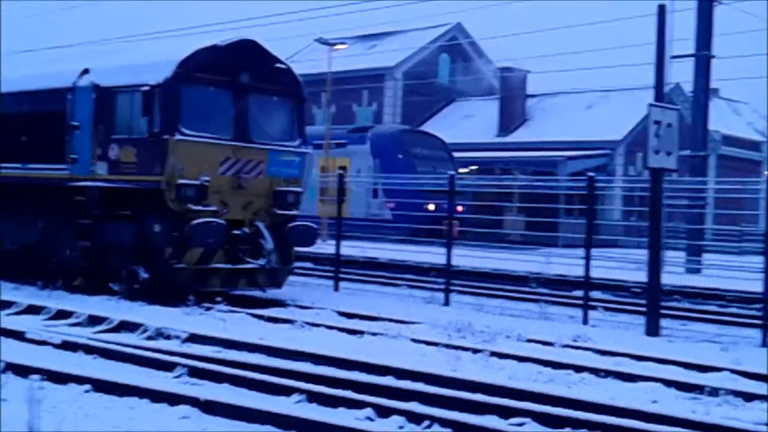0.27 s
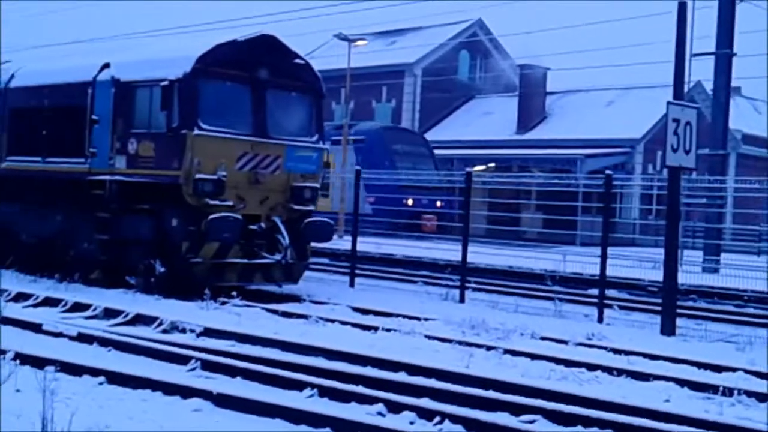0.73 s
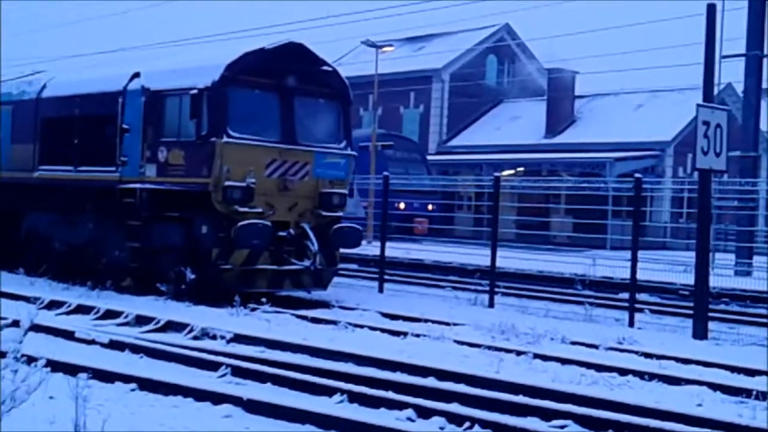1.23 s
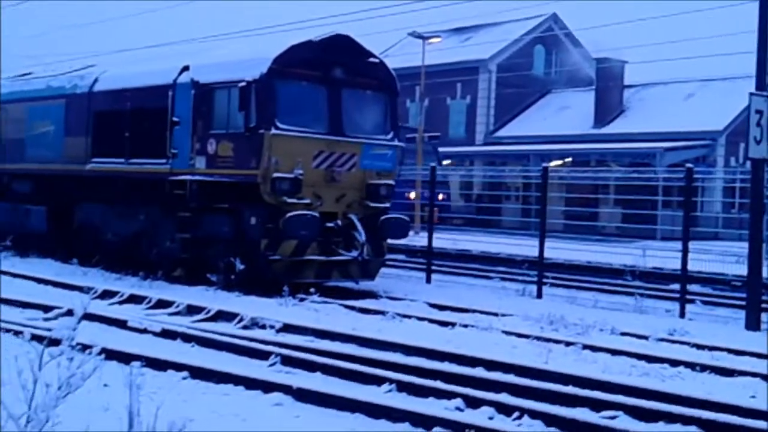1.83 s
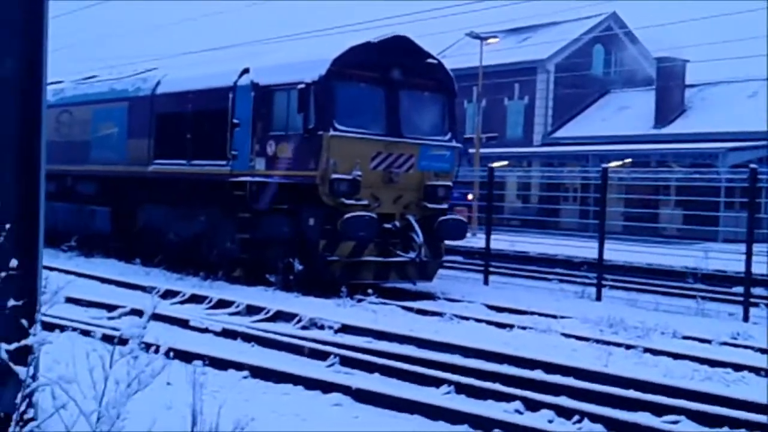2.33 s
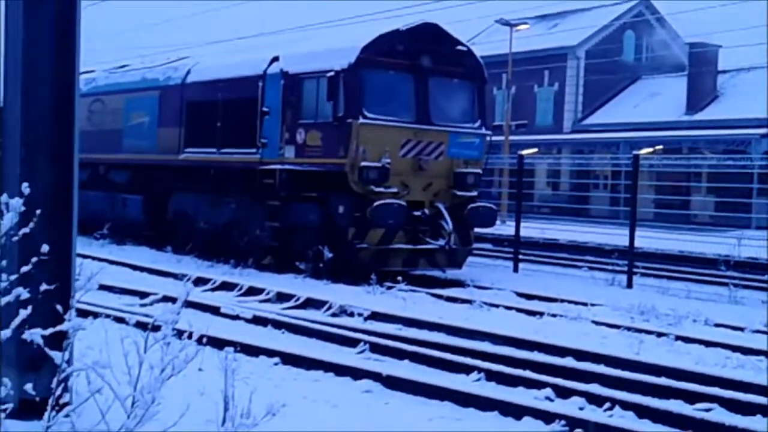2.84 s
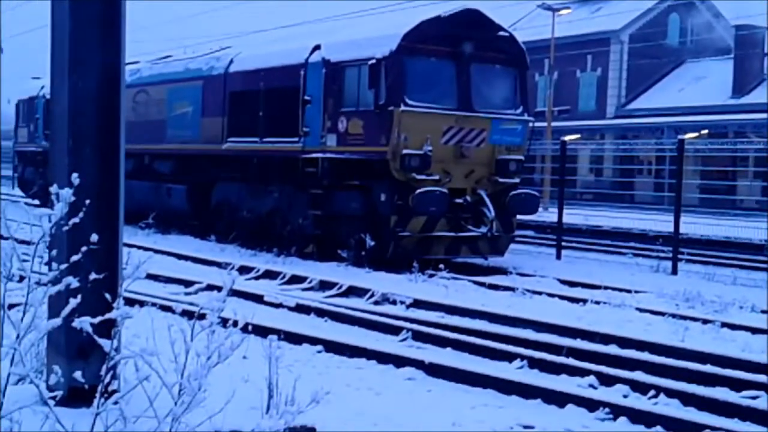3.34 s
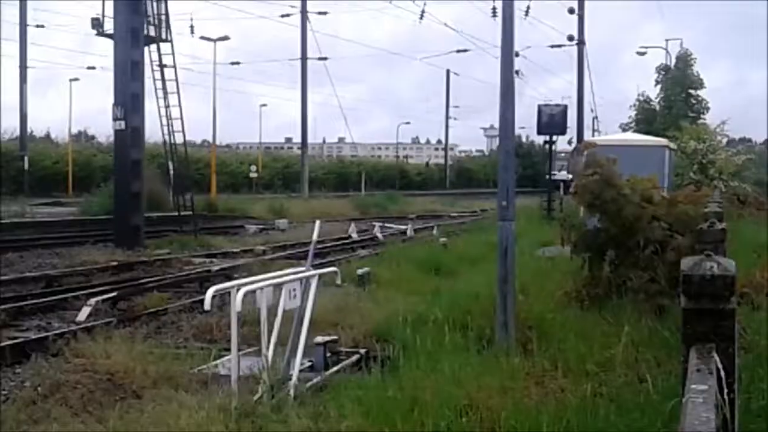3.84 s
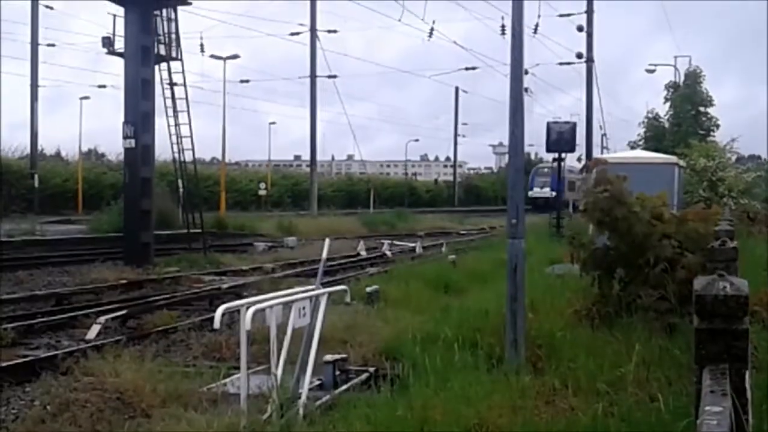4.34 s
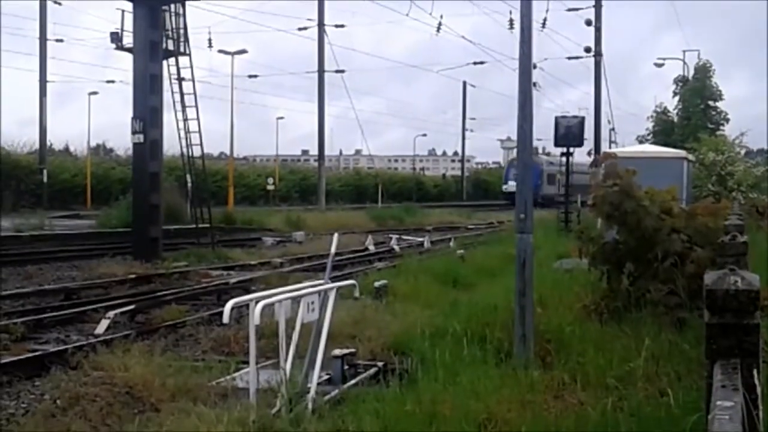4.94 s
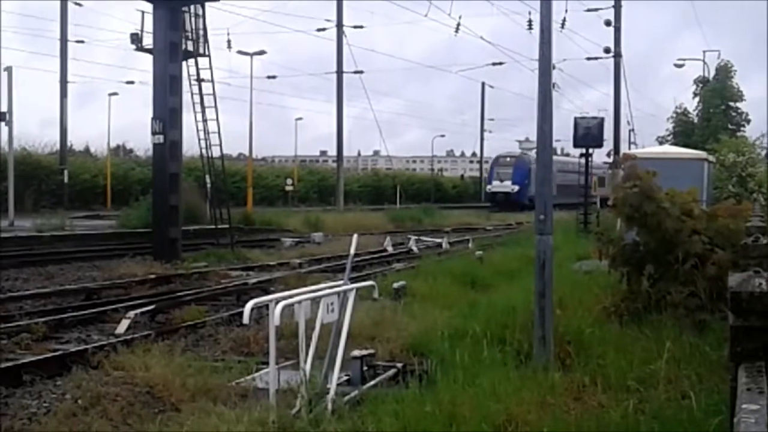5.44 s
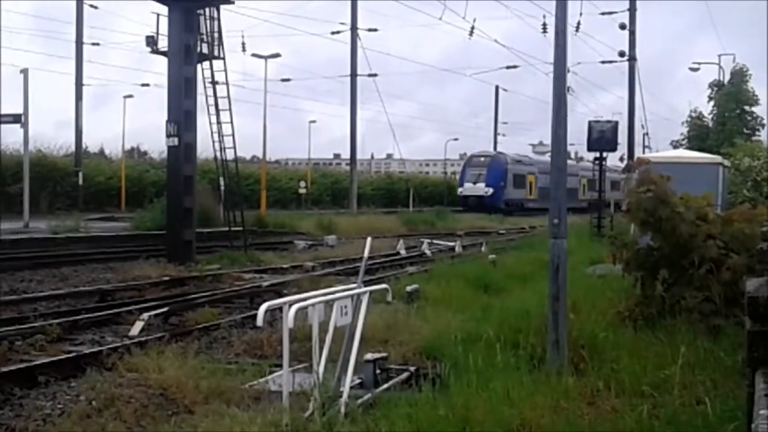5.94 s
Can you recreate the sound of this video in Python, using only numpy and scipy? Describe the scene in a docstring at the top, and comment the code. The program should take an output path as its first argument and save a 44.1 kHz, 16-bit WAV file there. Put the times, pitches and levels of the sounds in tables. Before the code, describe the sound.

A diesel locomotive rumbles by with loud, high wheel squeals; after a brief silence, an electric train approaches while raindrops tick close up.

```python
"""A diesel locomotive rumbles slowly through a curve in a snowy yard. Its flanges scrape, its running
gear moans, and stick-slip sets two wheels squealing and beating together. Fingers knock the camera.
After a short silence, a second yard: an electric train nears over wet tracks with rumble, wheel roar
and motor hum while raindrops tick on the camera's shell. A distant bird chirps in both yards."""
import sys
import numpy as np
from scipy import signal
from scipy.fft import rfft, irfft, next_fast_len
from scipy.io import wavfile
from scipy.ndimage import uniform_filter1d, map_coordinates

SR = 44100
rng = np.random.default_rng(int(sys.argv[2]) if len(sys.argv) > 2 else 0)


def log_audio(samples):
    """Write samples as a 16-bit WAV file to the path given in sys.argv[1]."""
    # one column per channel
    frames = np.atleast_2d(samples).T
    # limit to full scale, then quantise
    limited = np.clip(frames, -1, 1)
    pcm = np.round(limited * 32767).astype(np.int16)
    wavfile.write(sys.argv[1], SR, pcm)


N = 273414
SNOW_END_S, RAIN_START_S = 3.846, 4.234


def amp(db):
    """Decibels to gain."""
    return 10 ** (np.asarray(db) / 20)


def unit(x):
    """Scale to rms 1."""
    return x / np.sqrt(np.mean(np.abs(x) ** 2) + 1e-20)


def clock():
    """Sample times in seconds."""
    return np.arange(N) / SR


def curve(rows):
    """Interpolate (time, value) rows at every sample."""
    return np.interp(clock(), *np.transpose(rows))


def during(start_s, end_s, fade_s):
    """Gate with linear fades."""
    return np.clip(np.minimum(clock() - start_s, end_s - clock()) / fade_s, 0, 1)


def wobble(rate_hz):
    """Smooth random curve, rate_hz knots a second."""
    return map_coordinates(rng.standard_normal(8192), [clock() * rate_hz + 2], mode="wrap")


def filtered(x, response):
    """Apply a gain given as a function of frequency."""
    size = next_fast_len(N + 8192)
    return irfft(rfft(x, size) * response(np.fft.rfftfreq(size, 1 / SR)), size)[:N]


def rush(spectrum, patchy_db):
    """Coloured noise of rms 1 with random gain patches in time and frequency."""
    bins = signal.stft(rng.standard_normal(N), nperseg=512)[2]
    patches = uniform_filter1d(rng.standard_normal(bins.shape), size=4, axis=0)
    patches = uniform_filter1d(patches, size=12, axis=1)
    noise = signal.istft(bins * amp(patchy_db * unit(patches)), nperseg=512)[1][:N]
    hz, db = np.transpose(spectrum)
    return unit(filtered(noise, lambda f: amp(np.interp(np.log(f + 1), np.log(hz), db, left=-120))))


def spin(hz):
    """Phasor following a pitch curve."""
    return np.exp(2j * np.pi * np.cumsum(hz) / SR)


def scattered(share, rate_hz):
    """Complex gain of a direct path plus shifting reflections; mean power 1."""
    reflections = unit(wobble(rate_hz) + 1j * wobble(rate_hz))
    return np.sqrt(1 - share) + np.sqrt(share) * reflections


def hum(tones, share, rate_hz):
    """Machine tones of steady pitch and wavering level."""
    return sum(np.sqrt(2) * amp(db) * (spin(np.full(N, hz)) * scattered(share, rate_hz)).real
               for hz, db in tones)


def whistle(length_s, start_hz, end_hz, arch_hz):
    """Arched glide that swells and fades."""
    progress = np.linspace(0, 1, int(length_s * SR))
    arch = np.sin(np.pi * progress)
    return arch * spin(start_hz + (end_hz - start_hz) * progress + arch_hz * arch).imag


def tap(modes, centre_hz, width_octaves, contact_s, crack_db):
    """Small impact: a crack and a ring favouring the modes near centre_hz."""
    t = np.arange(SR // 25) / SR
    ring = np.zeros(len(t))
    for k, (hz, db, t60_s) in enumerate(modes):
        weight = 1 / (1 + (np.log2(hz / centre_hz) / width_octaves) ** 2)
        spread_db, detune = rng.normal(0, 1.5), rng.normal(1, .04)
        envelope = weight * amp(db + spread_db - 60 * t / t60_s)
        ring += (-1) ** k * envelope * np.sin(2 * np.pi * hz * detune * t)
    ring *= 1 - np.exp(-t / contact_s)
    crack = rng.standard_normal(len(t)) * amp(crack_db - 60 * t / .004)
    crack = signal.lfilter(*signal.butter(2, 6500, fs=SR), crack)  # soft contact dulls the top
    return ring / np.abs(ring).max() + crack


def add(track, start_s, sound):
    """Mix a short sound into a track."""
    part = track[max(round(start_s * SR), 0):][:len(sound)]
    part += sound[:len(part)]


def yard_echo(x, t60_s):
    """Diffuse echo from wagons and station walls."""
    t = np.arange(SR // 2) / SR
    tail = rng.standard_normal(len(t)) * amp(-60 * t / t60_s) * (t > .01)
    return signal.fftconvolve(x, tail / np.linalg.norm(tail))[:N]


# Locomotive noise spectra: (frequency [Hz], relative density [dB])
EXHAUST_SPECTRUM = [(12, -38.5), (20, -20.5), (86, 6), (103, 0), (124, 0), (320, -23), (420, -42.5),
                    (700, -120)]
ROLLING_SPECTRUM = [(120, -33), (200, -4.5), (258, -4.5), (338, -6), (384, -3.5), (465, -5), (640, -8.5),
                    (727, -10), (1540, -13), (1640, -14.5), (2480, -16), (3000, -25.5), (4610, -17.5),
                    (6650, -34.5), (9000, -41.5), (11700, -61), (19800, -120)]
HISS_SPECTRUM = [(1500, -23.5), (2100, 4.5), (3200, 2), (7000, -0.5), (10000, -1), (15000, -2)]
# Engine hum and fan whine: (frequency [Hz], level [dB])
ENGINE_TONES = [(79, -68.5), (97, -55), (388, -57.5), (554, -64), (2083, -69.5)]


def locomotive(curve_entry_s=1.3, curve_full_s=1.85):
    """Steady exhaust, engine tones and a few moans; rolling noise and hiss grow in the curve."""
    in_curve = np.interp(clock(), [curve_entry_s, curve_full_s], [0, 1])
    exhaust = amp(-45.5 + .75 * wobble(20)) * rush(EXHAUST_SPECTRUM, patchy_db=1.5)
    rolling = amp(-50 + 1.24 * in_curve + .8 * wobble(12)) * rush(ROLLING_SPECTRUM, patchy_db=1.6)
    hiss = amp(-56.5 + 3 * in_curve) * rush(HISS_SPECTRUM, patchy_db=1.9)
    return exhaust + rolling + hiss + gear_moans() + hum(ENGINE_TONES, share=.38, rate_hz=10)


# Flange rubbing: (time [s], level [dB])
SCRAPE_LEVEL = [(0, -62), (1.25, -62), (1.285, -52), (1.38, -58.5), (2.3, -54), (2.9, -56), (3.6, -47.5)]
# Flange noise: (frequency [Hz], relative density [dB])
FLANGE_SPECTRUM = [(2600, -19.5), (3400, -12), (4200, -7), (5100, 1.5), (5800, -22.5), (8000, -40.5)]


def flange_scrape():
    """Flanges rub the rail with an uneven hiss."""
    return amp(curve(SCRAPE_LEVEL) + 1.3 * wobble(37)) * rush(FLANGE_SPECTRUM, patchy_db=1.5)


# Syllables: (time [s], length [s], start pitch [Hz], end pitch [Hz], arch [Hz], relative level [dB])
BIRD_CHIRPS = [(.215, 0.018, 4860, 4080, 90, -50), (0.764, 0.025, 3990, 4750, 340, -44.5),
               (.792, 0.039, 3850, 3860, 540, -52), (0.798, 0.025, 3480, 3430, 202, -49.5),
               (0.83, 0.052, 3410, 2970, -110, -52), (1.397, 0.04, 4580, 2680, 80, -58),
               (1.955, 0.029, 2740, 3940, -150, -50), (1.993, .033, 3400, 3080, 170, -50),
               (2.026, .024, 3100, 2890, -30, -48), (3.48, .044, 3680, 3220, 208, -50.5),
               (3.53, 0.046, 3360, 2930, -10, -51), (5.911, .058, 4520, 4190, 129, -44)]


def bird():
    """Short, distant whistles blurred by the yard."""
    song = np.zeros(N)
    for start_s, length_s, start_hz, end_hz, arch_hz, db in BIRD_CHIRPS:
        add(song, start_s, amp(db + 2.5) * whistle(length_s, start_hz, end_hz, arch_hz))
    return song + amp(-2.5) * yard_echo(song, t60_s=.5)


# Finger bumps: (time [s], relative level [dB])
FINGER_KNOCKS = [(0.356, -32), (0.397, -35.5), (0.4157, -31.5), (0.468, -20)]
# Camera case modes: (frequency [Hz], relative level [dB], t60 [s])
CASE_MODES = [(380, -5, .013), (660, 0, .014), (1150, -4, .011), (2500, -8, .006)]


def knocks(click_band_hz=(500, 3000), click_t60_s=.006, thud_hz=130, thud_t60_s=.04):
    """Fingers bump the camera: a dry click, the case rings, the whole body thuds."""
    out, t = np.zeros(N), np.arange(SR // 25) / SR
    click_filter = signal.butter(3, click_band_hz, "bandpass", fs=SR)
    thud = amp(-13 - 60 * t / thud_t60_s) * np.sin(2 * np.pi * thud_hz * t)
    for start_s, db in FINGER_KNOCKS:
        ring = tap(CASE_MODES, centre_hz=640, width_octaves=1.1, contact_s=.00016, crack_db=-24)
        burst = rng.standard_normal(len(t)) * amp(4 - 60 * t / click_t60_s)
        click = signal.lfilter(*click_filter, burst)
        add(out, start_s, amp(db) * (ring + click + thud))
    return out


# Gear moans: (time [s], length [s], start pitch [Hz], end pitch [Hz], relative level [dB])
GEAR_MOANS = [(0.622, 0.35, 620, 645, -49.5), (0.85, 0.31, 632, 657, -54.5), (2.12, 0.11, 975, 1000, -53),
              (2.704, 0.2, 642, 592, -53), (2.899, .19, 601.3, 658, -48)]


def gear_moans():
    """The running gear gives soft, sliding hoots."""
    out = np.zeros(N)
    for start_s, length_s, start_hz, end_hz, db in GEAR_MOANS:
        add(out, start_s, amp(db + .5) * whistle(length_s, start_hz, end_hz, arch_hz=3.2))
    return out * amp(2.3 * wobble(25))


def wheel_envelope(levels, fade_s=.03):
    """Ring amplitude of a wheel, faded out beyond its first and last rows."""
    return amp(curve(levels)) * during(levels[0][0] - fade_s, levels[-1][0] + fade_s, fade_s)


def wheel_mode(pitch, envelope, chatter, jitter_hz, tremble_db, chatter_hz):
    """Stick-slip keeps one mode ringing; pitch and level tremble with the creep."""
    level = np.sqrt(2) * envelope * amp(tremble_db * wobble(45))
    return level * spin(curve(pitch) + jitter_hz * wobble(50)) * scattered(chatter, chatter_hz)


# Wheel pitch, sliding with the creep: (time [s], frequency [Hz])
FRONT_WHEEL_PITCH = [(1.44, 4602), (1.7, 4630), (1.95, 4580), (2.15, 4640), (2.41, 4630), (2.79, 4780),
                     (2.95, 4720), (3.17, 4785), (3.32, 4730), (3.54, 4770)]
REAR_WHEEL_PITCH = [(1.73, 4705), (1.92, 4798), (2.04, 4742), (2.14, 4750), (2.28, 4690), (2.57, 4708),
                    (2.66, 4810), (2.88, 4845), (3.16, 4790), (3.41, 4830), (3.48, 4918), (3.61, 4945),
                    (3.74, 4914), (3.85, 4945)]
# Ring of each wheel and of their octave: (time [s], relative level [dB])
FRONT_WHEEL_LEVEL = [(1.44, -57), (1.54, -36), (1.71, -22.5), (1.83, -34.5), (1.95, -32), (2.14, -52),
                     (2.32, -55), (2.42, -24), (2.62, -31.5), (2.95, -27), (3.07, -20), (3.25, -31.5),
                     (3.33, -22.5), (3.48, -31), (3.54, -45)]
REAR_WHEEL_LEVEL = [(1.73, -38), (1.83, -20), (1.93, -25), (2.04, -20.5), (2.17, -34), (2.331, -18.5),
                    (2.42, -29.5), (2.51, -19.5), (2.58, -18.5), (2.65, -30), (2.95, -31), (3.181, -19),
                    (3.42, -32), (3.5, -19), (3.61, -36), (3.791, -18), (3.85, -32)]
OCTAVE_LEVEL = [(1.55, -75), (1.74, -65), (1.83, -49), (1.93, -60), (2.21, -70), (2.46, -47), (2.62, -43.5),
                (2.7, -57), (3.25, -59.5), (3.39, -48), (3.57, -68), (3.84, -62)]


def squeal(lock_db=-21.5, lock_width_db=2.5):
    """Two wheels ring slightly apart and beat; hard slip adds the octave and other modes."""
    front_env, rear_env = wheel_envelope(FRONT_WHEEL_LEVEL), wheel_envelope(REAR_WHEEL_LEVEL)
    level = np.hypot(front_env, rear_env) + 1e-4
    # Chatter below lock_db, clean tone above.
    chatter = .68 / (2.5 + np.exp((20 * np.log10(level) - lock_db) / lock_width_db))
    front = wheel_mode(FRONT_WHEEL_PITCH, front_env, .75 * chatter,
                       jitter_hz=9, tremble_db=1.2, chatter_hz=150)
    rear = wheel_mode(REAR_WHEEL_PITCH, rear_env, chatter, jitter_hz=8, tremble_db=1.1, chatter_hz=165)
    doubled = sum(wheel * np.exp(1j * np.angle(wheel)) for wheel in (front, rear))
    octave = doubled / (level + .004) * amp(curve(OCTAVE_LEVEL) + .5) * scattered(.2, rate_hz=170)
    # The rough rail head smears noise around each tone.
    skirt = amp(-21) * (front + rear) * scattered(1, rate_hz=330)
    sound = (amp(-1.05) * (front + rear) + skirt + octave).real + side_modes()
    return sound + amp(-15) * yard_echo(sound, t60_s=.4)


# Brief wheel modes: (start [s], end [s], start pitch [Hz], end pitch [Hz], relative level [dB])
SIDE_MODES = [(1.94, 2.25, 4330, 4368, -36.5), (2.42, 2.62, 4250, 4260, -52), (2.43, 2.6, 5165, 5185, -49),
              (2.48, 2.79, 7250, 7360, -56), (2.61, 2.76, 4375, 4375, -53), (2.77, 3.2, 7430, 7390, -63),
              (2.98, 3.14, 4385, 4385, -52), (3.02, 3.1, 7130, 7130, -56), (3.2, 3.27, 4920, 4920, -39),
              (3.42, 3.69, 7420, 7350, -56.5)]


def side_modes():
    """Weaker wheel modes catch, slide a little and let go."""
    out = np.zeros(N)
    for start_s, end_s, start_hz, end_hz, db in SIDE_MODES:
        hz = np.interp(clock(), [start_s, end_s], [start_hz, end_hz])
        tone = (spin(hz) * scattered(.3, rate_hz=start_hz / 36)).real
        out += amp(db + 3 + 1.5 * wobble(18)) * during(start_s, end_s, fade_s=.033) * tone
    return out


# Train rumble, wheel roar, wet hiss, fine hiss: (frequency [Hz], relative density [dB])
RUMBLE_SPECTRUM = [(12, -50), (20, -15), (98, 6.5), (203, 0), (247, -6), (304, -10.5), (370, -10.5),
                   (405, -34), (450, -43), (580, -63), (990, -120)]
ROAR_SPECTRUM = [(180, -48), (300, 1), (372, -14), (404, -2.5), (453, -5), (585, 0), (939, 0), (1180, -7),
                 (1490, -3.5), (1790, -10.5), (2760, -8.5), (3090, -34), (3500, -11.5), (4550, -47),
                 (7700, -120)]
WET_SPECTRUM = [(800, -21), (1200, -1), (1500, -5.5), (1900, -3), (2350, -8), (2800, -3.5), (3500, -9),
                (4800, -3.5), (6000, -12.5), (7200, -16.5), (8500, -24), (11000, -26), (15000, -44.5)]
FINE_HISS_SPECTRUM = [(5000, -26), (8000, -7), (11000, -6.5), (15000, -7)]
# Rumble on approach: (time [s], relative level [dB])
RUMBLE_LEVEL = [(4.45, -42.5), (4.52, -39), (5.45, -41), (5.51, -36.5), (5.65, -39.5), (5.98, -36.5),
                (6.19, -35.5)]
# Motor hum: (frequency [Hz], level [dB])
MOTOR_TONES = [(101, -48.5), (200, -68.5), (411, -61.5), (565, -58), (605, -61)]


def electric_train(near_s=5.94):
    """Rumble and wheel roar grow as the train nears, over motor hum and the wet yard's hiss."""
    nearness = np.clip((clock() - RAIN_START_S) / (near_s - RAIN_START_S), 0, 1) ** 1.96
    rumble = amp(curve(RUMBLE_LEVEL) + 1 + 1.3 * wobble(22)) * rush(RUMBLE_SPECTRUM, patchy_db=2)
    roar = amp(-46.5 + 10 * nearness + 1.1 * wobble(30)) * rush(ROAR_SPECTRUM, patchy_db=1.2)
    wet_hiss = amp(-43.5 + 2 * nearness + .5 * wobble(12)) * rush(WET_SPECTRUM, patchy_db=.9)
    fine_hiss = amp(-57.5) * rush(FINE_HISS_SPECTRUM, patchy_db=1.5)
    return rumble + roar + wet_hiss + fine_hiss + hum(MOTOR_TONES, share=.28, rate_hz=15)


# Drops on the camera: (time [s], relative level [dB], ring centre [Hz])
NEAR_DROPS = [(4.2632, -12, 2900), (4.4142, -10.5, 3100), (4.4674, -24, 4750), (4.6597, -14, 2150),
              (4.7106, -14.5, 2080), (4.7152, -10.5, 4040), (4.9635, -12.5, 2200), (5.1511, -3.5, 2300),
              (5.4559, -14.5, 3120), (5.7684, -18.5, 4800), (5.7729, -17.5, 2280), (5.8107, -17, 2180),
              (5.894, -13, 4330), (6.0807, -16.5, 5260), (6.1436, -18.5, 2050), (5.849, -20, 2680),
              (4.354, -31, 2720)]
# Camera shell modes: (frequency [Hz], relative level [dB], t60 [s])
SHELL_MODES = [(1430, -0.5, 0.0066), (1900, 2.5, 0.0041), (2854, 0.5, 0.003), (4710, 1, 0.0035),
               (6330, -6.5, 0.0028)]
# Bursting drops: (time [s], length [s], level [dB])
SPRAY_BURSTS = [(5.035, 0.037, -37.5), (5.844, 0.0082, -35)]
# Spray noise: (frequency [Hz], relative density [dB])
SPRAY_SPECTRUM = [(3500, 2.5), (5000, -3), (7200, -2), (10000, -16.5), (15000, -26)]


def rain(faint_count=110, second_push_s=.00095):
    """A few drops ring the camera's shell or burst into spray; many fainter ones land around it."""
    ticks = np.zeros(N)
    for start_s, db, centre_hz in NEAR_DROPS:
        hit_s = start_s + .0005
        tick = amp(db - 2.2) * tap(SHELL_MODES, centre_hz, width_octaves=.85,
                                   contact_s=.00008, crack_db=-16)
        add(ticks, hit_s, tick)
        # The collapsing drop pushes once more.
        add(ticks, hit_s + second_push_s * rng.uniform(.88, 1.12), amp(-9) * tick)
    for when, size, octaves in rng.random((faint_count, 3)):
        hit_s = RAIN_START_S + when * (N / SR - RAIN_START_S)
        tick = tap(SHELL_MODES, 4000 * 2 ** octaves, width_octaves=.5, contact_s=.0001, crack_db=-16)
        add(ticks, hit_s, amp(-38 + 11 * size ** 2) * tick)
    bursts = sum(amp(db) * during(start_s, start_s + length_s, fade_s=length_s / 2)
                 for start_s, length_s, db in SPRAY_BURSTS)
    spray = bursts * rush(SPRAY_SPECTRUM, patchy_db=1.5)
    return ticks + spray + amp(-22.5) * yard_echo(ticks, t60_s=.021)


def scene():
    """Snowy yard, silence, rainy yard; a bird calls in each."""
    chirps = bird()
    snowy = locomotive() + squeal() + flange_scrape() + knocks() + chirps
    rainy = electric_train() + rain() + chirps
    snowy *= during(-1, SNOW_END_S, fade_s=.002)
    rainy *= during(RAIN_START_S, 7, fade_s=.002)
    return (snowy + rainy)[None]


def record(dry):
    """Brick-wall low-pass at the camera's band limit."""
    return filtered(dry[0], lambda hz: hz < 15250)[None]


dry = scene()
out = record(dry)
log_audio(out)
```